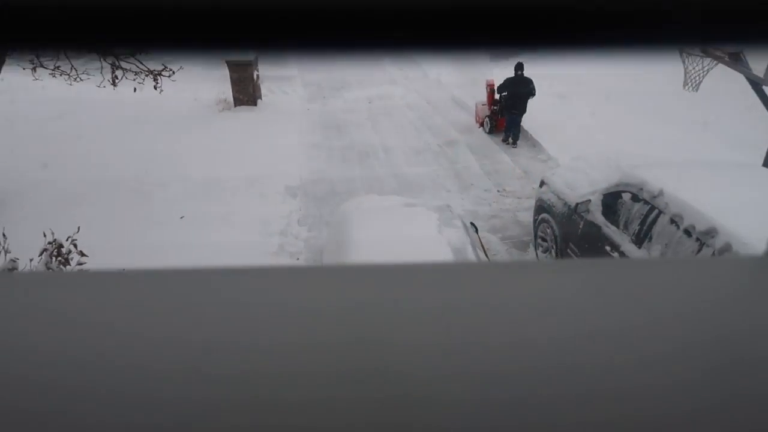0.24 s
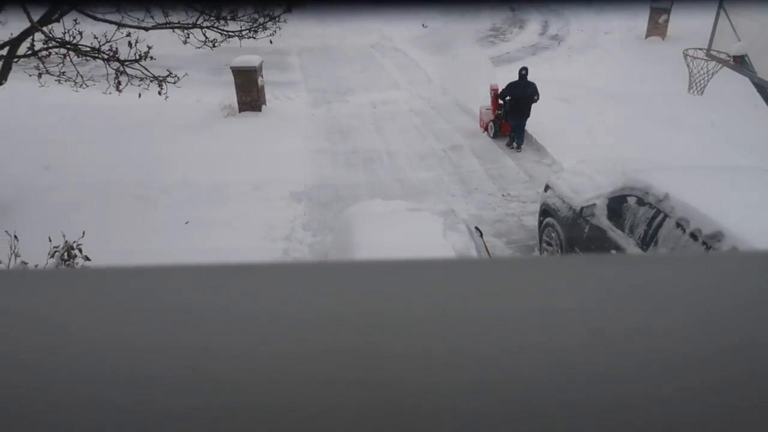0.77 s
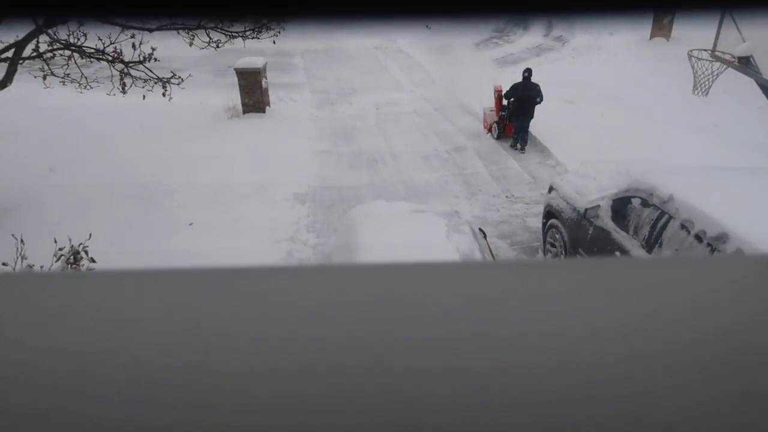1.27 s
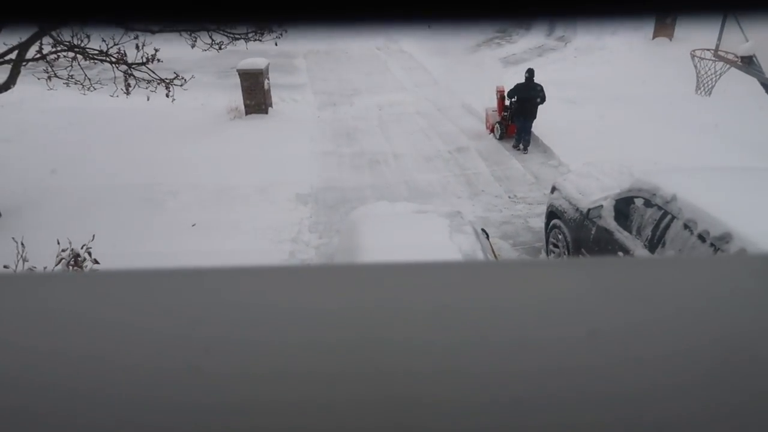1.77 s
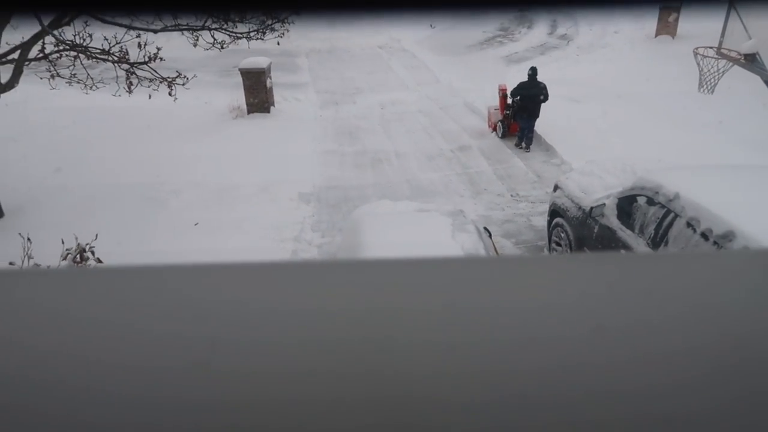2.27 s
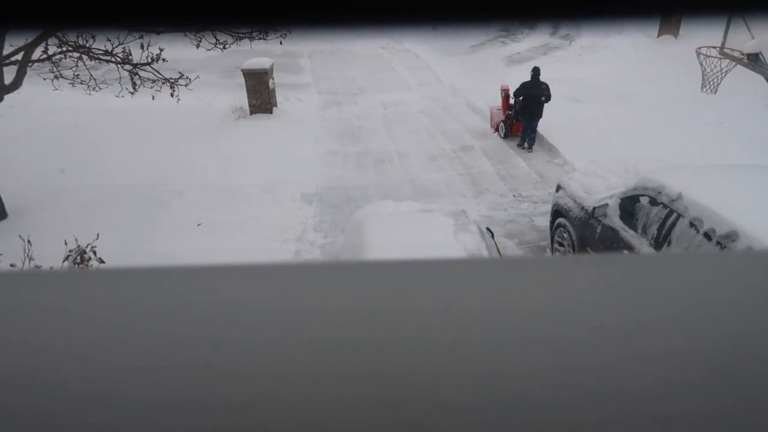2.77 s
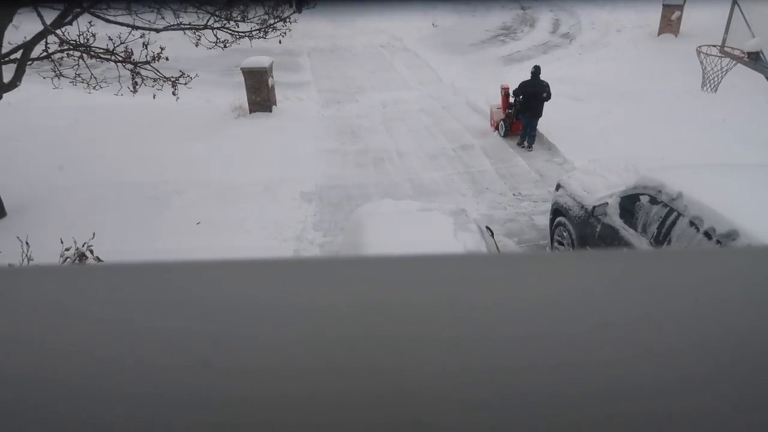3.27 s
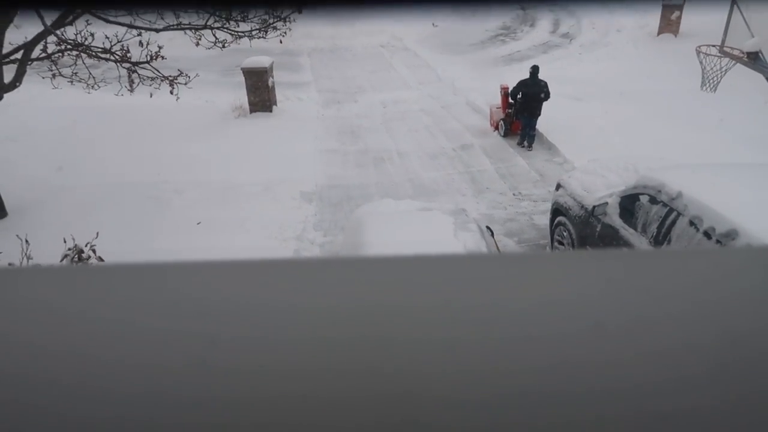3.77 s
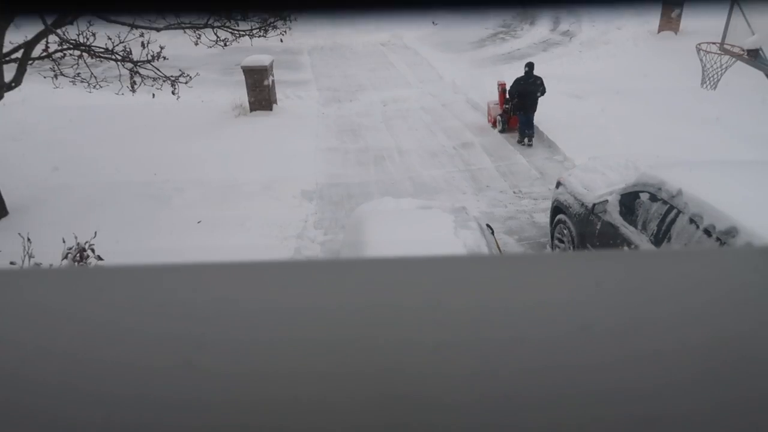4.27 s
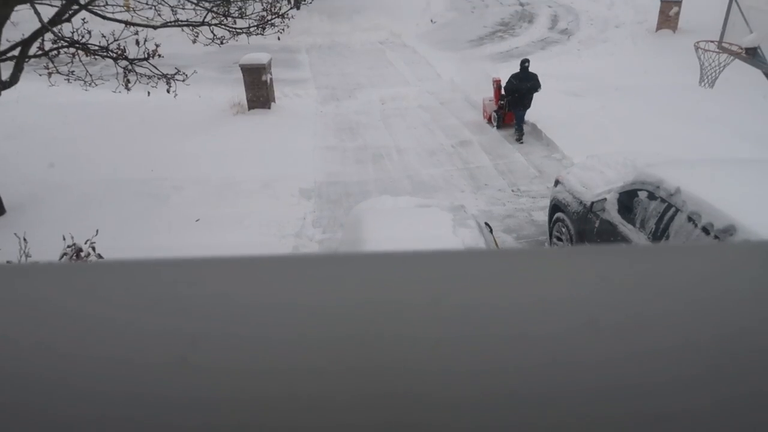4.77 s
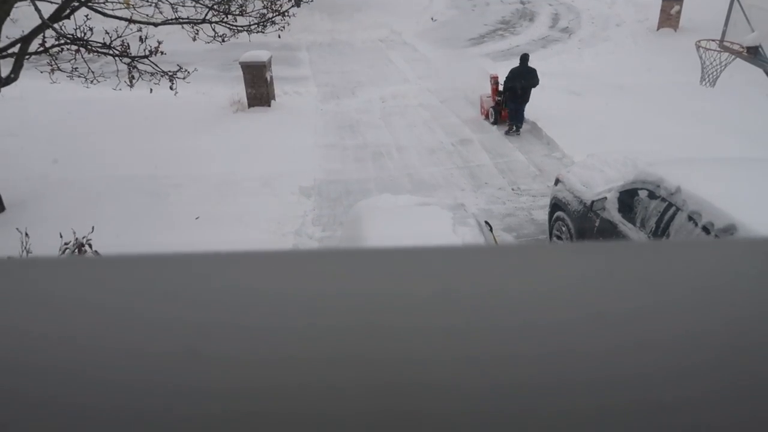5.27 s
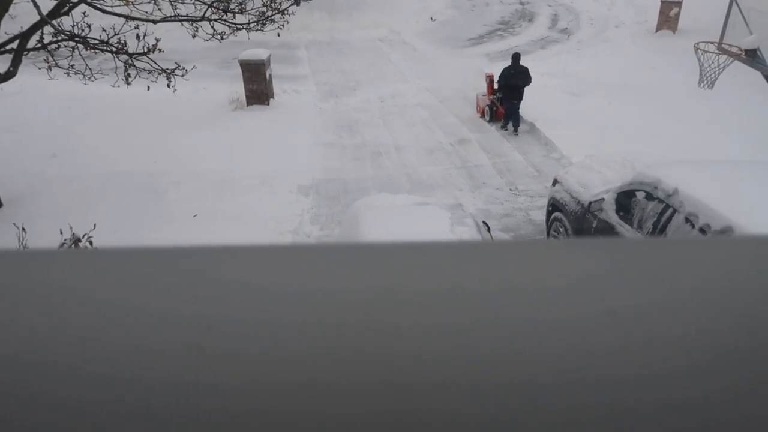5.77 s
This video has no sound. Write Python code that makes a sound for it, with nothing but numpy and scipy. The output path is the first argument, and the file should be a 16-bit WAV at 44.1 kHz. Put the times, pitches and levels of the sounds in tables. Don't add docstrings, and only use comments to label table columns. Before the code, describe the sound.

Heard indoors through a closed window, a single-cylinder snowblower chugs far down a driveway, a low, boomy, fast throb with a dull rattle. A furnace hums beneath, with a faint wavering duct whine and soft hiss. Two tiny plastic ticks sound close by midway. Late on, the engine sags in pitch, and housing clatter, scraping and snow spray grow. Spaced stereo microphones stay indoors.

```python
import sys
import numpy as np
from scipy import signal
from scipy.fft import rfft, irfft, next_fast_len
from scipy.io import wavfile
from scipy.ndimage import uniform_filter1d, map_coordinates

SR = 44100
rng = np.random.default_rng(int(sys.argv[2]) if len(sys.argv) > 2 else 0)


def nominal_scale(level):
    x = np.asarray(level, float) / 20
    return 10 ** x


def unload_audio(sound):
    columns = np.transpose(np.atleast_2d(sound))
    steps = np.round(np.clip(columns, -1, 1) * 32767)
    wavfile.write(sys.argv[1], SR, steps.astype(np.int16))


N = 266364
T = np.arange(N) / SR
COARSE_T = T[::64]


def unit(x):
    return x / np.sqrt(np.mean(x ** 2) + 1e-20)


def along(points, hz):
    f, v = np.transpose(points)
    return np.interp(np.log(hz + 1), np.log(f + 1), v)


def curve(points):
    s, v = np.transpose(points)
    return np.interp(T, s, v)


def wobble(rate):
    knots = rng.standard_normal(400)
    return np.interp(T, COARSE_T, map_coordinates(knots, [COARSE_T * rate]))


def tone(turns, db, drift_db, drift_turns, rate):
    level = np.sqrt(2) * nominal_scale(db + drift_db * wobble(rate))
    return level * np.cos(2 * np.pi * (turns + drift_turns * wobble(rate)))


def filtered(x, response):
    m = next_fast_len(N + SR // 2)
    return irfft(rfft(x, m) * response(np.fft.rfftfreq(m, 1 / SR)), m)[..., :N]


def shaped(points):
    return lambda hz: nominal_scale(along(points, hz))


def ringing(modes):
    def gain(f):
        return sum(nominal_scale(db) * np.abs(f * w / (c * c - f * f + 1j * f * w + 1e-9)) ** 2
                   for c, w, db in modes)
    return gain


def diffuse(response, gate, alike):
    def mid_side(hz):
        angle = np.arccos(np.clip(along(alike, hz), -1, 1)) / 2
        return response(hz) * [np.cos(angle), np.sin(angle)]

    mid, side = filtered(gate * rng.standard_normal((2, N)), mid_side)
    return unit(np.array([mid + side, mid - side]))


# time_s, rate_hz
FIRING_RATE = [(0, 29.81), (0.3, 29.42), (1.3, 29.73), (2.4, 29.67), (3, 29.87), (3.75, 29.78),
               (4.25, 29.55), (4.75, 28.61), (5, 28.55), (6.04, 27.89)]
# freq_hz, level_db (per Hz)
SHAKE = [(14, -52.5), (26, -17.5), (70, -4.5), (100, 2.5), (120, 2.5), (136, 1), (155, 1), (195, 7.5),
         (225, -5), (275, 7), (300, 0.5), (320, -13.5), (375, -28.5), (600, -120)]
# centre_hz, width_hz, level_db
PANE = [(341.4, 8.8, 8.5), (362, 15, -4), (395.6, 20, -1), (414, 16, -6.5), (461, 33, 0), (544.5, 33.4, -2),
        (716.5, 32, -4.5), (819, 28, -7), (854.4, 15, -5.5)]
# freq_hz, left_right_likeness
WINDOW_ALIKE = [(60, 1), (130, 1), (290, .96), (630, 1), (1370, 0.34)]


def engine():
    rate = curve(FIRING_RATE)
    sag_hz, bite_db = effort(rate)
    turns = np.cumsum(rate) / SR + 1 / 4
    run_in_db = -4 * np.exp(-T / 0.066)
    load_db = -1.28 + 0.65 * sag_hz + 0.011 * bite_db + run_in_db
    pane_db = -6 * sag_hz

    beat = 1 + 0.49 * np.cos(2 * np.pi * turns) + 0.14 * np.cos(4 * np.pi * turns)
    shake = nominal_scale(-39.0) * diffuse(shaped(SHAKE), beat, WINDOW_ALIKE)
    pane = nominal_scale(-58.0 + 0.66 * pane_db) * diffuse(ringing(PANE), beat, WINDOW_ALIKE)
    boom_db = -47 + sag_hz + bite_db
    boom = tone(10 * turns + 0.22, boom_db + 0.5, 1.35, 0.079, 11)

    loaded = nominal_scale(load_db) * (low_orders(turns, rate) + thrower(turns) + shake)
    return loaded + boom + high_orders(turns, rate, pane_db) + pane + auger(turns, sag_hz, bite_db)


# time_s, strength_db, length_s
BITES = [(.08, 0, 0.037), (0.317, 8, 0.018), (0.46, 3, 0.046), (1.028, 3, 0.066), (1.21, 5, 0.038),
         (1.615, 4, 0.038), (2.364, 5, 0.076), (2.604, 4, 0.064), (3.274, 7.5, 0.051), (3.851, 4.5, .08),
         (4.214, 6, 0.12), (4.484, 8.5, 0.095), (4.69, 8.5, 0.086), (4.92, -6, 0.071), (5.078, 7, 0.038),
         (5.19, -6, 0.053), (5.38, 11, 0.13), (5.632, 12, 0.076), (5.91, 13, 0.16)]


def effort(rate):
    free_hz = 29.7
    swells = sum(db * np.exp(-((COARSE_T - s) / length) ** 2) for s, db, length in BITES)
    return np.clip(free_hz - rate, 0, 3), np.interp(T, COARSE_T, swells)


# freq_hz, level_db (rms)
WALL = [(30, -70), (58, -54), (89, -44), (116, -38.5), (141, -43.5), (149, -36.5), (169, -35.5),
        (178, -41.5), (197, -41.5), (208, -48), (226, -76), (238, -41), (254, -43), (268, -65)]


def low_orders(turns, rate):
    return sum(tone(k * turns + 0.3 * (k % 2), along(WALL, k * rate), 2.05, 0.1, 4.6)
               for k in range(1, 10))


def high_orders(turns, rate, pane_db):
    grid_hz = np.arange(1000.)
    gain = ringing(PANE)(grid_hz)
    total = 0
    for k in range(11, 31):
        order = tone(k * turns + rng.random(), -63 + pane_db * (k > 18), 1.7, 0.15, 6)
        total = total + np.interp(k * rate, grid_hz, gain) * order
    return total


# multiple, level_db (rms)
IMPELLER = [(1, -53.5), (2, -52.5), (3, -46.5), (5, -62)]


def thrower(turns):
    return sum(tone(k * 1.764 * turns, db, 4.5, 0.25, 4.04) for k, db in IMPELLER)


def auger(turns, sag_hz, bite_db):
    return (spray(sag_hz) + clatter(turns, sag_hz, bite_db)
            + scrape(turns, sag_hz, bite_db))


# centre_hz, width_hz, level_db
HOUSING = [(1275, 32, -3), (1308, 24, 0)]


def clatter(turns, sag_hz, bite_db):
    leftover_db = 6.5 * np.exp(-(T / 0.32) ** 2)
    packed_hz = np.minimum(np.interp(T - 0.22, T, sag_hz), 1.14)
    rolling_away_db = -0.95 * T
    level_db = -66 + leftover_db + rolling_away_db + 8 * packed_hz + 0.15 * bite_db

    depth_db = np.clip(level_db + 68, 1, 6)
    jolt = nominal_scale(depth_db * np.cos(2 * np.pi * (turns - 0.09)) + 1.6 * wobble(35))
    jolt = jolt / np.sqrt(uniform_filter1d(jolt ** 2, SR // 5))
    ring = tone(1318 * T, -1.5, 3.3, 0.26, 25)
    ring = ring + nominal_scale(-3) * diffuse(ringing(HOUSING), 1, [(1300, 1.0)])
    return nominal_scale(level_db - 3.5) * jolt * ring


# freq_hz, level_db (per Hz)
SCRAPE = [(300, -120), (420, 2), (640, -7.5), (1000, -12.5), (1400, -14.5), (2500, -23), (4500, -30.5),
          (7000, -43), (9000, -120)]


def scrape(turns, sag_hz, bite_db):
    level_db = -57.5 + 1.5 * sag_hz + 0.13 * bite_db
    rasp = (1 + 0.29 * np.cos(2 * np.pi * (turns - 0.05))) * nominal_scale(1.2 * wobble(20))
    return nominal_scale(level_db) * diffuse(shaped(SCRAPE), rasp, WINDOW_ALIKE)


# freq_hz, level_db (per Hz)
SPRAY = [(2000, -58.5), (3000, -4), (4000, 0), (5500, 0.5), (7500, -19.5), (9000, -60)]


def spray(sag_hz):
    return nominal_scale(-92 + 12 * sag_hz) * diffuse(shaped(SPRAY), nominal_scale(3.8 * wobble(40)), WINDOW_ALIKE)


# start_s, peak_db, dull_db, bright_db
TICKS = [
    (3.009, -33, -8, -4),
    (3.1106, -31.5, -15.5, -1.5),
]
# start_s, peak_db, pitch_hz, t60_s
PINGS = [
    (5.457, -48.5, 2700, .022),
    (5.458, -46, 900, .015),
    (5.875, -47, 1480, .03),
    (5.876, -50, 1320, .05),
]
# pitch_hz, level_db, t60_s
BRIGHT = [(2500, -1, 0.012), (2820, 1, 0.012), (3200, 3, .013), (3480, 2.5, 0.014), (3800, -2, .011)]
# pitch_hz, level_db, t60_s
DULL = [(690, -5, .05), (890, 4, 0.032), (1080, -3, .025), (1660, 0, .028), (2430, -5, .028)]


def ticks():
    near, far = np.zeros(N + SR), np.zeros(N + SR)
    t = np.arange(SR // 20) / SR

    def ring(modes):
        attack = 1 - np.exp(-t / 0.0008)
        return attack * sum(nominal_scale(db - 60 * t / t60) * np.sin(2 * np.pi * hz * t)
                            for hz, db, t60 in modes)

    for s, db, dull_db, bright_db in TICKS:
        creak = nominal_scale(db + dull_db) * ring(DULL) + nominal_scale(db + bright_db - 6.5) * ring(BRIGHT)
        near[round(s * SR):][:len(t)] += creak
    for s, db, hz, t60 in PINGS:
        far[round(s * SR):][:len(t)] += ring([(hz, db, t60)])
    return np.array([near[:N], np.roll(near, shift=4)[:N]]) + far[:N]


# pitch_hz, level_db (rms)
FAN = [(36.8, -50), (45.3, -49.5), (55.3, -56), (60, -52), (73.6, -46)]
# time_s, pitch_hz
WHINE = [(0, 468), (.25, 476.3), (.9, 461.3), (1.15, 470), (1.4, 457), (2, 463.7), (2.55, 483),
         (3.4, 465.2), (4.15, 470.3), (4.85, 458.2), (5.55, 477.7), (6.04, 471)]


def furnace():
    hum = tone(120 * T, -39, 1.0, 0.0025, 6.3)
    fan = sum(tone(hz * T + rng.random(), db, 1.0, 0.087, 2.23) for hz, db in FAN)
    whine = tone(np.cumsum(curve(WHINE)) / SR, -56.5, 1.2, 0.12, 16)
    return hum + fan + whine


# freq_hz, level_db (per Hz)
AIR = [(70, -40), (200, -14), (330, 2.5), (460, 1.5), (540, -3.5), (1500, -9), (4220, -15), (8000, -23),
       (11600, -30), (13900, -34.5), (14800, -36.5), (16000, -60)]
# freq_hz, left_right_likeness
HISS_ALIKE = [(300, 0), (1500, 0), (4000, -.15), (8000, 0), (14000, .1)]
# pitch_hz, level_db (rms)
WHISTLES = [(13007, -92), (11778, -106), (14236, -108)]


def air():
    whistle = sum(tone(hz * T, db, 1, 0.02, 6) for hz, db in WHISTLES)
    whistle = whistle * (1 + 0.8 * np.cos(2 * np.pi * 30 * T))
    return nominal_scale(-56) * diffuse(shaped(AIR), nominal_scale(0.4 * wobble(4.3)), HISS_ALIKE) + whistle


def spaced(x, lag_s):
    def shift(hz):
        half = np.pi * hz * lag_s / (1 + (hz / 420) ** 4)
        return np.exp(1j * half * [[-1], [1]])
    return filtered(x, shift)


def scene():
    return spaced(engine() + furnace() + ticks(), lag_s=0.00009) + air()


def band_limit(x):
    return signal.sosfilt(signal.butter(12, 15100, fs=SR, output="sos"), x)


def record(dry):
    edges = np.clip(np.minimum(T, T[-1] - T) / 0.004, 0, 1)
    mix = (dry + 0.0003) * np.sin(np.pi / 2 * edges) ** 2
    return band_limit(mix)


dry = scene()
out = record(dry)
unload_audio(out)
```